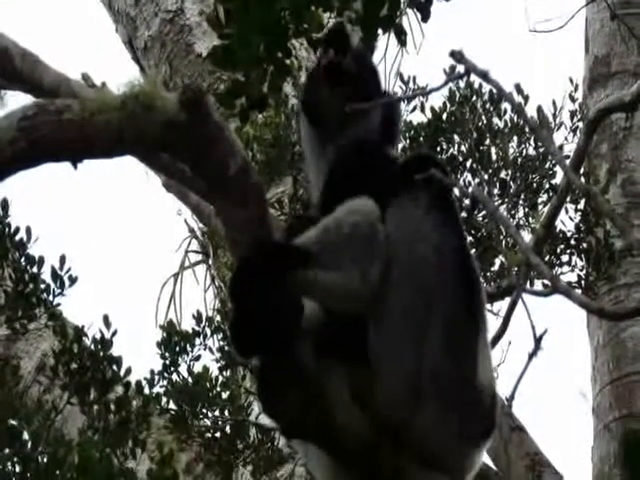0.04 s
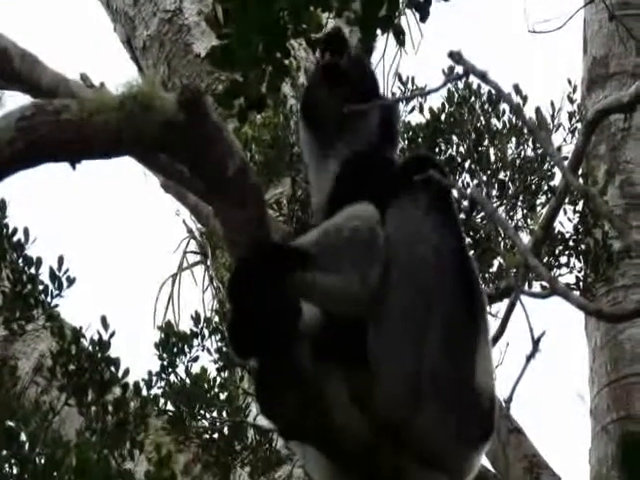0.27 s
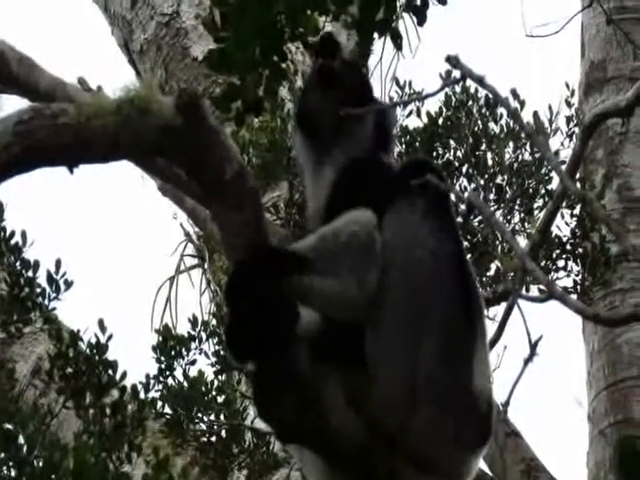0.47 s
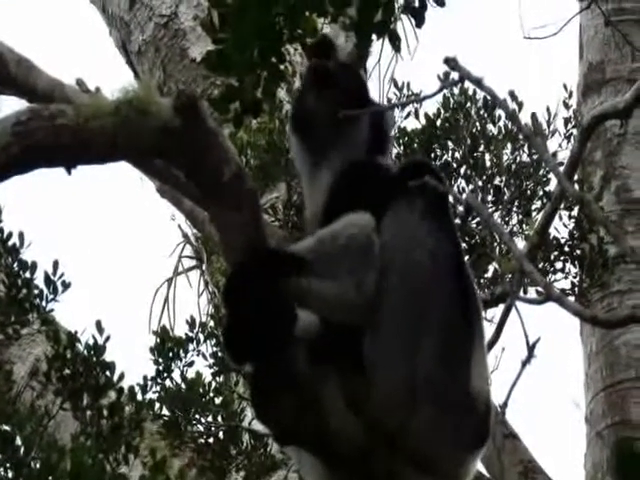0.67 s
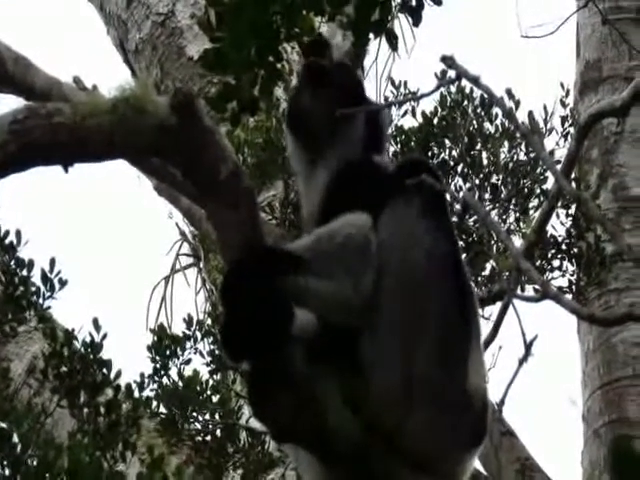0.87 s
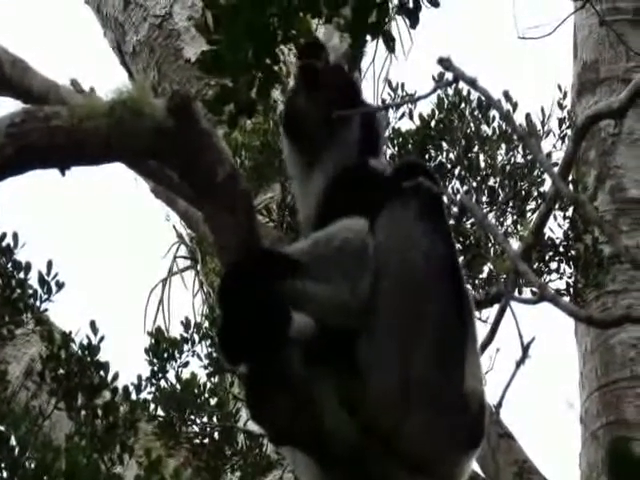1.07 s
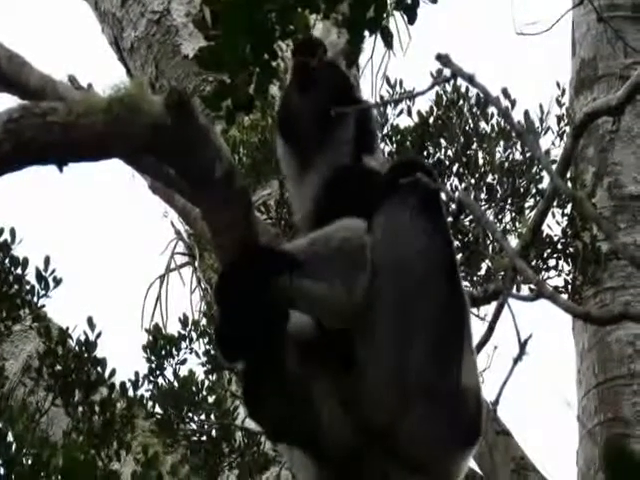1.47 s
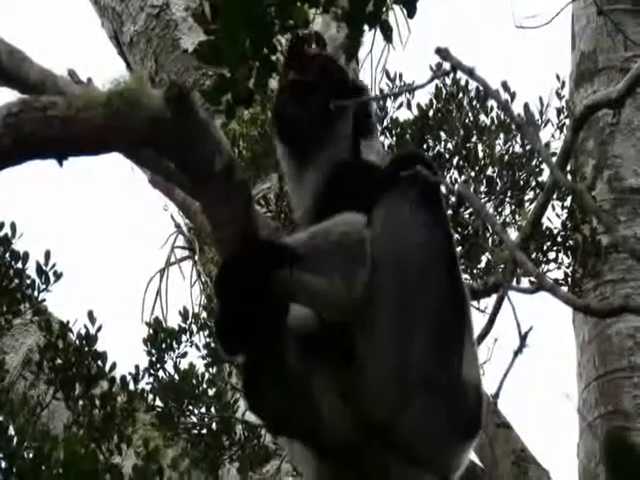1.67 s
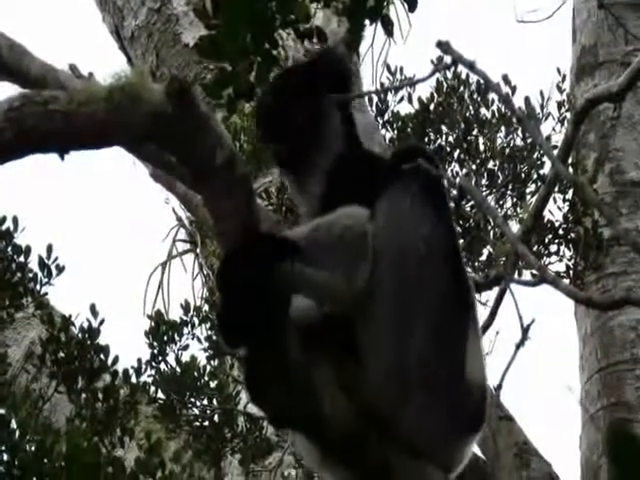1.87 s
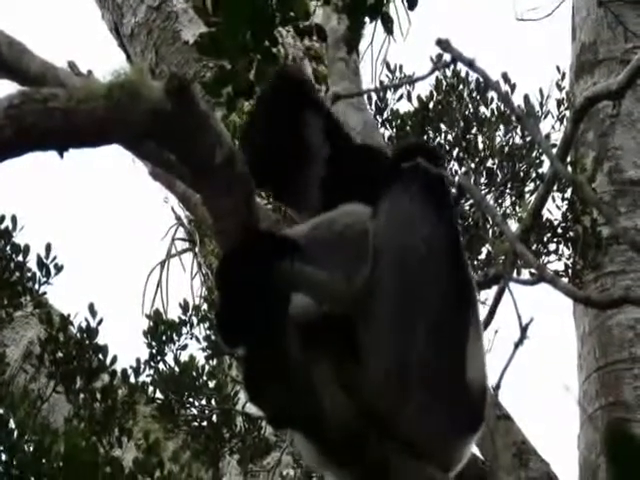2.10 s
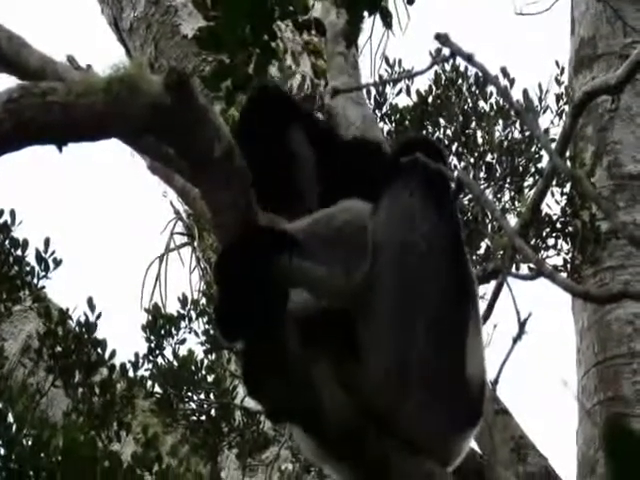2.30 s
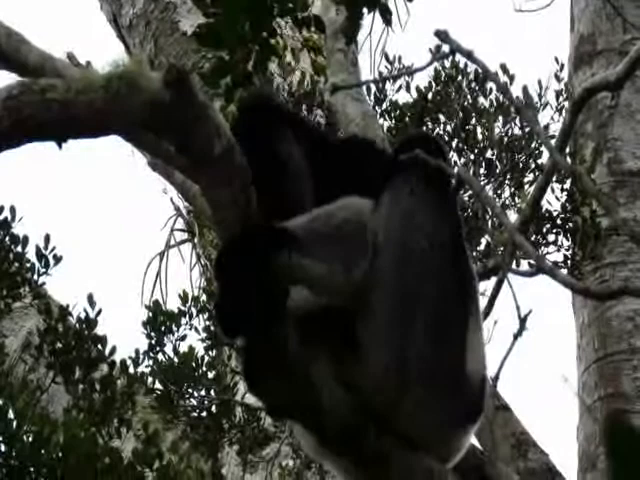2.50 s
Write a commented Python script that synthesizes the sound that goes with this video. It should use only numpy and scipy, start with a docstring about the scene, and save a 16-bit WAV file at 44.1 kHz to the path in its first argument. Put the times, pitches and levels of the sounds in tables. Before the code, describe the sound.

An indri lemur yelps into one loud, horn-like wail that sags, lifts and ends in a rough fall. A second, farther away, joins on a higher, level note. Both echo through a quiet forest, with brief crackly distortion.

```python
"""Over a faint rainforest hush, the echo of an earlier call dies away. An indri (a large lemur) yelps
and holds one long, horn-like wail that sags, with brief bursts of crackly distortion. Near its end a
second indri, farther off, joins on a higher, level note. The first voice lifts and ends in a rough
fall; the second holds on, then stops. Trunks and leaves throw both calls back."""
import sys
import numpy as np
from scipy import signal
from scipy.fft import rfft, irfft
from scipy.io import wavfile
from scipy.ndimage import uniform_filter1d

SR = 44100
rng = np.random.default_rng(int(sys.argv[2]) if len(sys.argv) > 2 else 0)


def to_wav(sig):
    """Store sig (one row per channel, or 1-D mono) as 16-bit WAV at the path in sys.argv[1].

    Samples outside -1..1 are clipped; the rate is SR.
    """
    pcm = np.clip(np.atleast_2d(sig), -1, 1) * 32767
    pcm = np.round(pcm).astype(np.int16)
    wavfile.write(sys.argv[1], SR, pcm.T)  # frames by channels


N = 116865
T = np.arange(N) / SR
HZ = np.fft.rfftfreq(N, 1 / SR)


def amp(db):
    """Turns decibels into a number to multiply by."""
    return 10 ** (np.asarray(db) / 20)


def unit(x):
    """Scales a signal to an average power of 1."""
    return x / np.sqrt(np.mean(x ** 2) + 1e-20)


def curve(points):
    """Joins points in time with straight lines."""
    return np.interp(T, *np.transpose(points))


def spectrum(points, hz):
    """Joins points with straight lines on a log frequency scale."""
    freqs, values = np.transpose(points)
    return np.interp(np.log(hz + 1), np.log(freqs + 1), values)


def noise(gain):
    """Noise coloured by a gain at each frequency."""
    return unit(irfft(rfft(rng.standard_normal(N)) * gain, N))


def drift(rate_hz):
    """A random wobble, up to about the given rate."""
    return noise(1 / (1 + (HZ / rate_hz) ** 4))


def gate(start, end, attack, release):
    """A smooth rise, hold and fall, all in seconds."""
    ramp = np.clip(np.minimum((T - start) / attack, (end - T) / release), 0, 1)
    return np.sin(np.pi / 2 * ramp) ** 2


# Colour of the hush. Each row: frequency in Hz, relative level in dB.
HUSH_COLOUR = [(25, -16), (60, -7), (130, -3), (300, 0), (600, -4), (1200, -7), (2400, -10), (4000, -17),
               (6000, -22), (10500, -38)]
# How alike the two ears are. Each row: frequency in Hz, likeness from 0 to 1.
HUSH_LIKENESS = [(80, .9), (200, .35), (2000, .3)]
# Loudness of the hush. Each row: time in seconds, level in dB.
HUSH_LOUDNESS = [(.19, -48), (.3, -55), (1.3, -56.5), (1.7, -65), (2.0, -63), (2.65, -54)]
def hush():
    """Air in the leaves makes a faint, wavering noise, nearly the same in both ears in the bass."""
    same = spectrum(HUSH_LIKENESS, HZ)
    left, other = rfft(rng.standard_normal((2, N)))
    right = same * left + np.sqrt(1 - same ** 2) * other
    ears = irfft(np.array([left, right]) * amp(spectrum(HUSH_COLOUR, HZ)), N)
    waver_db = 2.2 * drift(rate_hz=12)
    return unit(ears) * amp(curve(HUSH_LOUDNESS) + waver_db)


# Notes still ringing. Each row: frequency in Hz, width in Hz, starting level in dB.
RINGING_NOTES = [(797, 40, -58), (1180, 20, -53), (2335, 35, -54)]
def dying_echo(fade_db_per_s=31.5):
    """An earlier call still rings among the trees, as narrow bands of fading noise."""
    ears = np.zeros((2, N))
    for ear in ears:
        for hz, width, db in RINGING_NOTES:
            ear += amp(db) * noise(1 / (1 + ((HZ - hz) / width) ** 2) ** 2)
    return ears * amp(-fade_db_per_s * T)


# The forest's echo. Each row: frequency in Hz, seconds to fade by 60 dB, level in dB.
FOREST_ECHO = [(400, 2, -29), (840, 1.35, -13.5), (1574, 0.84, -14), (2570, 0.85, -11.5), (3330, 0.68, -7),
               (5750, 0.32, -3.5), (10000, 0.58, -4)]
def forest(tone, rasp, left_db, echo_boost, delay_s=0.016, echoes_per_s=2000):
    """The direct call plus echoes scattered by trunks and leaves, partly different at each ear."""
    shared, sides = rng.standard_normal((2, N)) * (rng.random((2, N)) < echoes_per_s / SR)
    bounces = unit(shared + 0.45 * np.array([[1], [-1]]) * sides) * (T > delay_s)
    hz, t, bands = signal.stft(bounces, SR, nperseg=256)
    table = np.array(FOREST_ECHO)
    fade_s = spectrum(table[:, [0, 1]], hz)[:, None]
    level_db = spectrum(table[:, [0, 2]], hz)[:, None]
    rate = np.log(1000) / fade_s
    fade = np.exp(-rate * t) * np.sqrt(2 * rate / SR)  # same energy however long it rings
    tail = signal.istft(bands * amp(level_db) * fade, SR, nperseg=256)[1]
    sent = (tone + amp(-6.5) * rasp) * amp(curve(echo_boost))  # the rasp echoes less
    echo = signal.fftconvolve(sent[None], tail, axes=1)[:, :N]
    return (tone + rasp) * amp([[left_db / 2], [-left_db / 2]]) + echo


# Colour of the gritty noise. Each row: frequency in Hz, relative level in dB.
RASP_COLOUR = [(40, -30.5), (200, -24), (450, -14.5), (750, 12.5), (1200, 6.5), (1800, 3.5), (2600, -0.5),
               (3600, -1), (5000, -12), (6800, -16), (8000, -28), (10500, -33)]
def voice(pitch, lows, upper, throat, bursts, opening, air_db=-56, lag_s=0.0021):
    """Stacked harmonics (multiples of the pitch). In rough bursts, pitch shakes and noise joins in."""
    roughness = sum(amp(db) * gate(start, start + length, 0.26 * length, 0.13 * length)
                    for start, length, db in bursts)
    shake = 0.0006 * drift(rate_hz=45) + 0.087 * roughness * drift(rate_hz=230)
    hz = uniform_filter1d(curve(pitch), size=200) * (1 + shake)
    phase = 2 * np.pi * np.cumsum(hz) / SR
    low_gains = [amp(curve(points)) for points in lows]
    tone = 0
    for k in range(1, 14):
        flutter_db = 4.5 * drift(rate_hz=20.5) + 2 * drift(rate_hz=4)
        if k <= len(lows):
            gain = low_gains[k - 1]
        else:
            gain = amp(curve(upper) + spectrum(throat, k * hz) + flutter_db)
        late_opening = np.interp(T - (k - 1) * lag_s, T, opening)  # high harmonics start last
        tone = tone + late_opening * gain * np.cos(k * phase + 2 * np.pi * rng.random())
    strength = opening * np.linalg.norm(low_gains, axis=0)
    rasp = strength * (amp(air_db) + roughness) * noise(amp(spectrum(RASP_COLOUR, HZ)))
    return np.sqrt(2) * tone, rasp


# The reply's note. Each row: time in seconds, pitch in Hz.
REPLY_PITCH = [(1.45, 1173), (1.55, 1181), (1.87, 1184), (2.04, 1185), (2.2, 1180), (2.31, 1197),
               (2.35, 1167), (2.39, 1168), (2.42, 1193)]
# Harmonics 1 to 4, then all higher ones. Each row: time in seconds, level in dB.
REPLY_1 = [(1.48, -32), (1.53, -27), (1.7, -21.5), (1.88, -23), (2.11, -17), (2.17, -20), (2.21, -26.5),
           (2.25, -24.5), (2.32, -29), (2.39, -24.5)]
REPLY_2 = [(1.479, -42), (1.53, -25.5), (1.668, -23), (1.8, -27.5), (1.864, -44), (1.99, -26.5),
           (2.04, -33.5), (2.127, -16), (2.171, -22), (2.205, -47), (2.241, -20.5), (2.283, -49),
           (2.322, -20), (2.353, -25.5), (2.401, -40.5)]
REPLY_3 = [(1.479, -46.5), (1.6, -40), (1.75, -35.5), (1.849, -29.5), (1.921, -35), (2.009, -24.5),
           (2.069, -40.5), (2.13, -26), (2.212, -43), (2.241, -21.5), (2.278, -66), (2.312, -21),
           (2.401, -49.5)]
REPLY_4 = [(1.629, -43.5), (1.721, -53.5), (1.869, -37.5), (1.96, -55.5), (2.16, -43.5)]
REPLY_HIGHS = [(1.499, -28.5), (1.871, -33), (1.983, -34), (2.141, -26.5), (2.391, -33)]
# Colour of those higher ones. Each row: frequency in Hz, added level in dB.
REPLY_COLOUR = [(5900, -28), (7100, -27.5), (8300, -43), (9500, -51.5)]
# Bursts of distortion. Each row: start in seconds, length in seconds, noise against the tone in dB.
REPLY_NOISE_BURSTS = [(2.16, 0.11, -26.5), (2.278, 0.29, -23)]
# How strongly the reply feeds the echo. Each row: time in seconds, boost in dB.
REPLY_ECHO = [(2.14, 0), (2.3, 9)]
def far_indri():
    """The farther animal replies on a higher, level note."""
    opening = gate(start=1.448, end=2.42, attack=0.035, release=0.031)
    lows = [REPLY_1, REPLY_2, REPLY_3, REPLY_4]
    tone, rasp = voice(REPLY_PITCH, lows, REPLY_HIGHS, REPLY_COLOUR, REPLY_NOISE_BURSTS, opening)
    return forest(tone, rasp, left_db=-0.4, echo_boost=REPLY_ECHO)


# The wail's tune. Each row: time in seconds, pitch in Hz.
WAIL_PITCH = [(.204, 993), (.209, 906), (.25, 915), (.356, 920.8), (.484, 926), (.68, 913.5), (.798, 894.7),
              (.87, 881.2), (.936, 853.4), (1.02, 825), (1.1, 811.5), (1.19, 806), (1.366, 800.9),
              (1.49, 806), (1.56, 816.2), (1.61, 831), (1.659, 861.3), (1.7, 893), (1.725, 896),
              (1.75, 843.5), (1.78, 738.8), (1.81, 573), (1.859, 383)]
# Harmonics 1 to 5, then all higher ones. Each row: time in seconds, level in dB.
WAIL_1 = [(.2, -15), (.235, -11), (.37, -10), (.51, -16), (.645, -10), (.7, -18), (.745, -11.5),
          (.825, -22), (.89, -12.5), (.935, -20.5), (1.0, -14), (1.12, -20), (1.29, -27), (1.36, -18),
          (1.5, -25.5), (1.55, -20.5), (1.7, -30.5), (1.79, -31)]
WAIL_2 = [(.21, -17.5), (0.328, -22), (.55, -17.5), (0.622, -23), (0.668, -16), (0.757, -25), (0.911, -13),
          (0.949, -19.5), (1.132, -10.5), (1.19, -18.5), (1.31, -10.5), (1.449, -12.5), (1.505, -15.5),
          (1.538, -13), (1.628, -28.5), (1.672, -16), (1.712, -31.5), (1.799, -29)]
WAIL_3 = [(0.203, -24.5), (.35, -40.5), (0.409, -28), (0.559, -25), (.7, -46.5), (0.776, -28), (.83, -36.5),
          (.98, -37), (1.057, -23.5), (1.271, -41), (1.469, -36), (1.561, -28.5), (1.722, -31.5),
          (1.81, -32)]
WAIL_4 = [(0.219, -21.5), (.35, -35), (.54, -35), (0.609, -27), (0.769, -22.5), (.92, -26), (1.07, -32),
          (1.11, -52.5), (1.159, -37), (1.281, -38.5), (1.481, -39.5), (1.659, -33), (1.748, -32.5),
          (1.8, -38)]
WAIL_5 = [(.21, -52.5), (.33, -33.5), (.49, -66.5), (0.599, -31.5), (.78, -43.5), (0.999, -35), (1.25, -40),
          (1.41, -35.5), (1.58, -59.5), (1.74, -38.5), (1.8, -42)]
WAIL_HIGHS = [(0.211, -21.5), (.5, -25), (0.779, -22.5), (1.06, -30), (1.351, -32.5), (1.55, -31.5),
              (1.64, -35), (1.732, -30.5), (1.789, -53.5)]
# Brassy colour of those higher ones. Each row: frequency in Hz, added level in dB.
WAIL_COLOUR = [(4900, -12), (5600, -17.5), (6450, -17.5), (7300, -25), (8200, -43.5), (9300, -36.5),
               (10300, -42)]
# Short bursts of distortion on the wail; the last row is its rough closing fall.
# Each row: start in seconds, length in seconds, noise against the tone in dB.
WAIL_NOISE_BURSTS = [(0.203, 0.024, -15), (0.79, 0.091, -21), (0.981, 0.051, -23), (1.078, 0.035, -22),
                     (1.247, 0.066, -34), (1.478, .045, -23.5), (1.725, 0.23, -7)]
# How strongly the wail feeds the echo. Each row: time in seconds, boost in dB.
WAIL_ECHO = [(.8, 2), (1.4, 5), (1.72, 7.5)]
def near_indri():
    """The nearer animal yelps into a long wail that sags, lifts and falls away."""
    opening = gate(start=0.1931, end=1.868, attack=0.013, release=0.21)
    lows = [WAIL_1, WAIL_2, WAIL_3, WAIL_4, WAIL_5]
    tone, rasp = voice(WAIL_PITCH, lows, WAIL_HIGHS, WAIL_COLOUR, WAIL_NOISE_BURSTS, opening)
    return forest(tone, rasp, left_db=0.3, echo_boost=WAIL_ECHO)


def scene():
    """Both callers over the quiet forest."""
    return near_indri() + far_indri() + hush() + dying_echo()


def record(dry):
    """Cuts away the treble above 10450 Hz."""
    lowpass = signal.firwin(511, 10450, window=("kaiser", 9), fs=SR)
    return signal.oaconvolve(dry, lowpass[None], "same")


dry = scene()
out = record(dry)
to_wav(out)
```